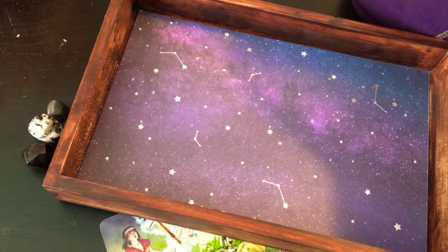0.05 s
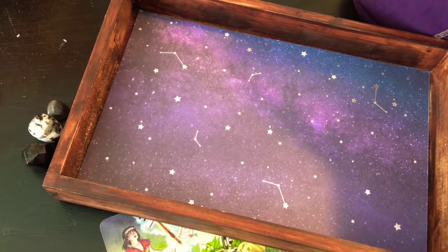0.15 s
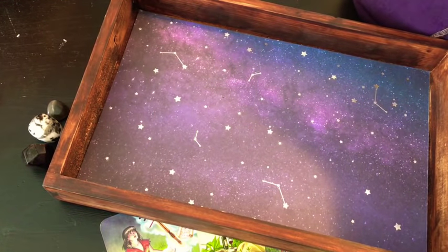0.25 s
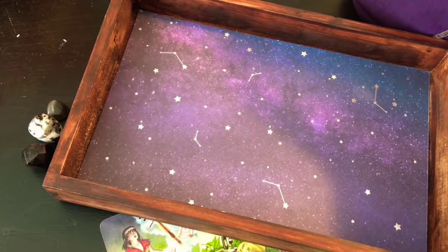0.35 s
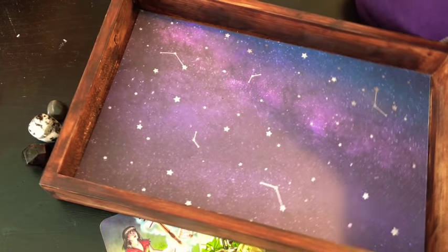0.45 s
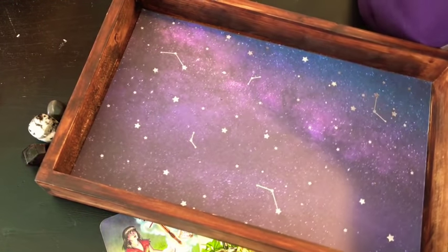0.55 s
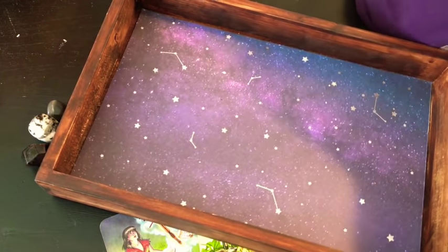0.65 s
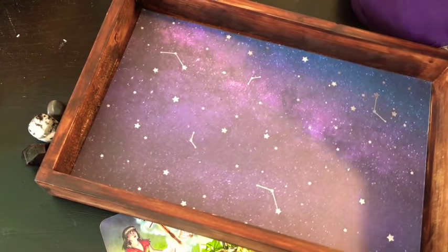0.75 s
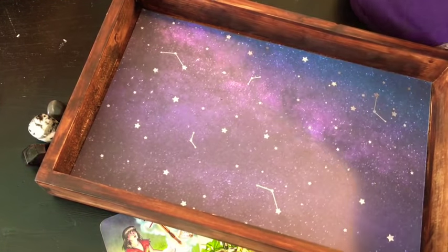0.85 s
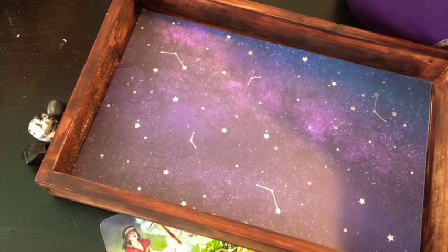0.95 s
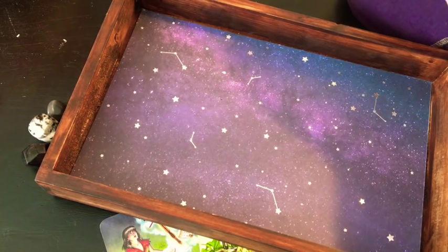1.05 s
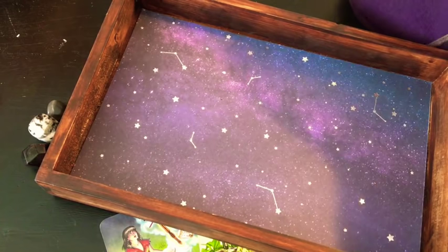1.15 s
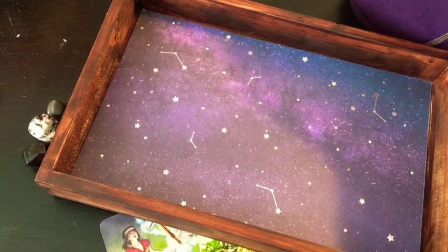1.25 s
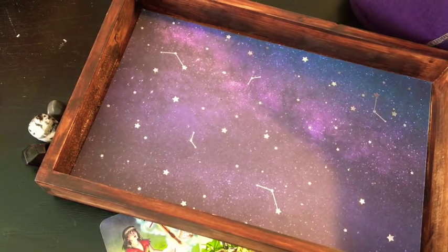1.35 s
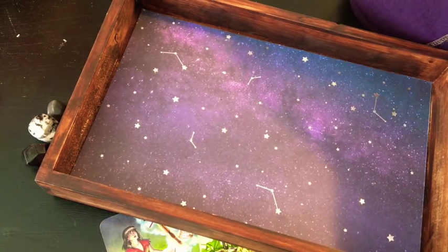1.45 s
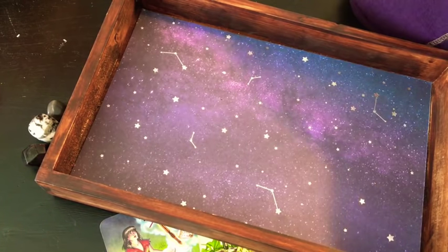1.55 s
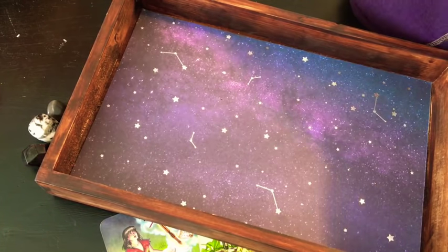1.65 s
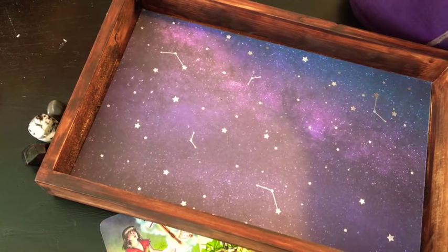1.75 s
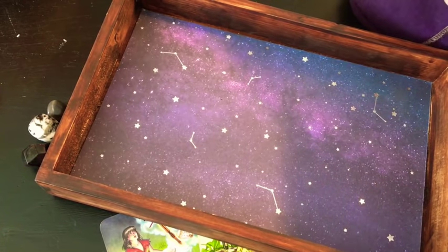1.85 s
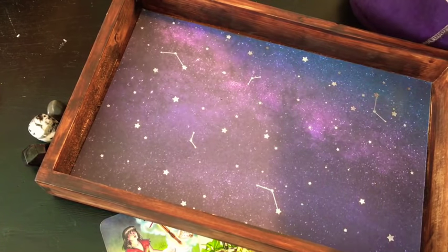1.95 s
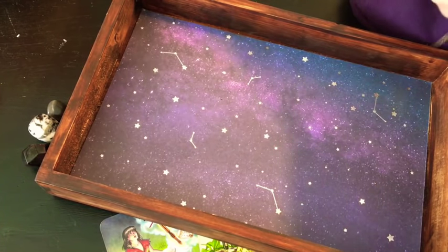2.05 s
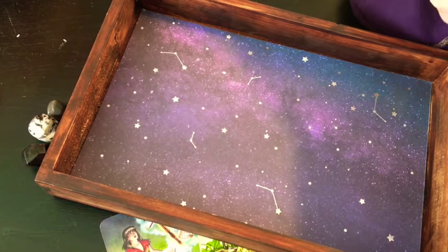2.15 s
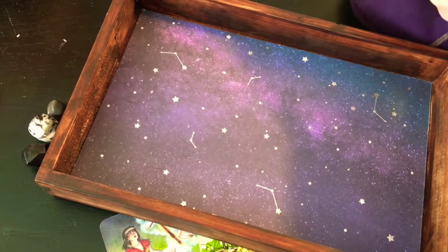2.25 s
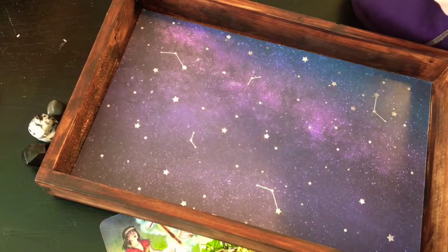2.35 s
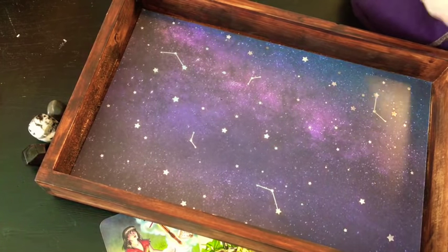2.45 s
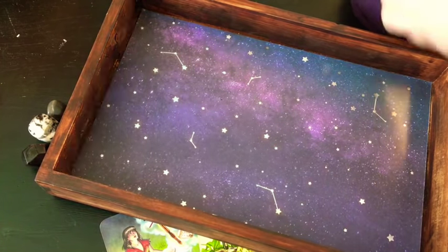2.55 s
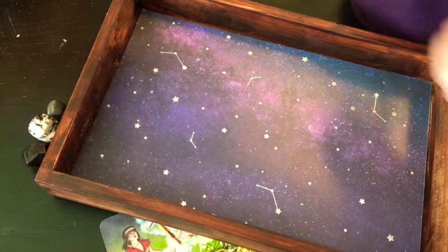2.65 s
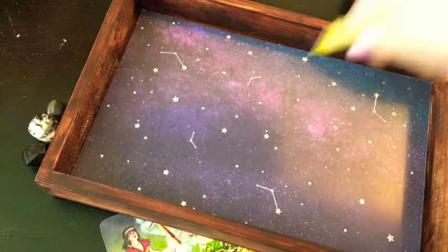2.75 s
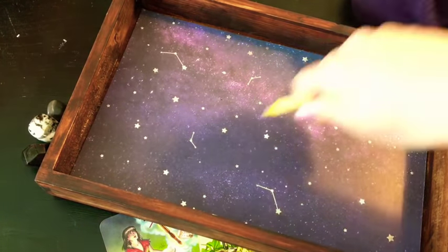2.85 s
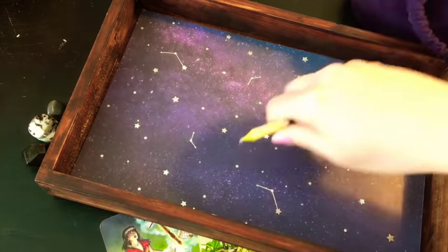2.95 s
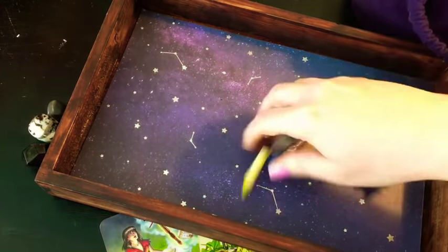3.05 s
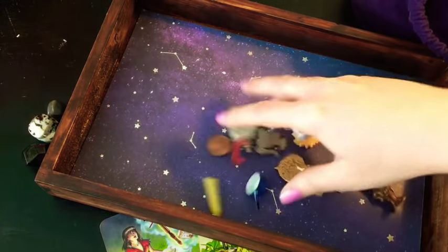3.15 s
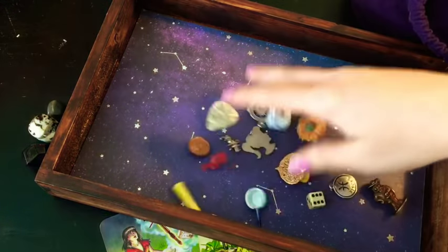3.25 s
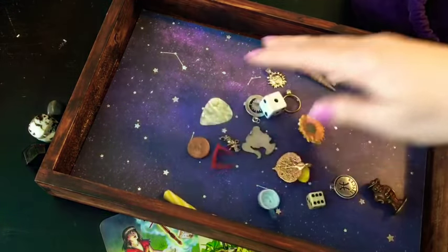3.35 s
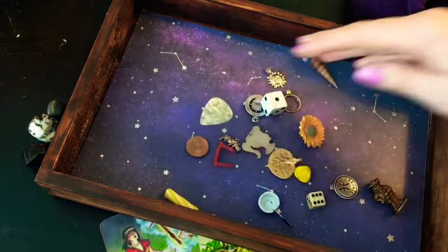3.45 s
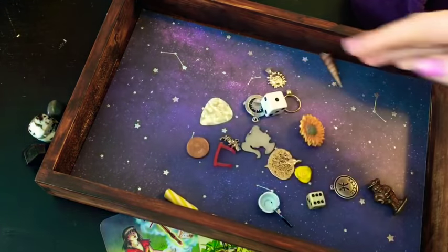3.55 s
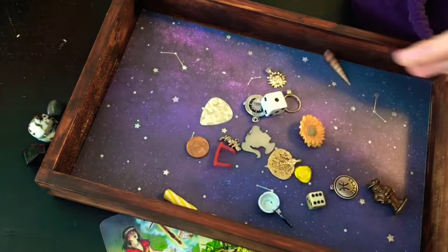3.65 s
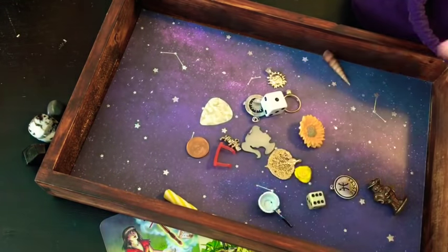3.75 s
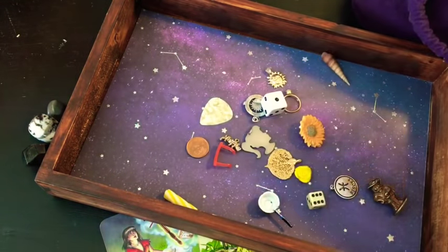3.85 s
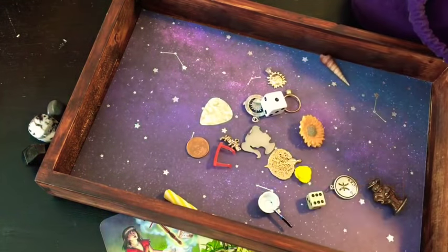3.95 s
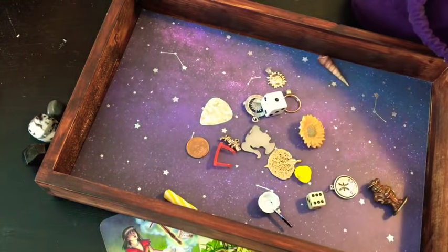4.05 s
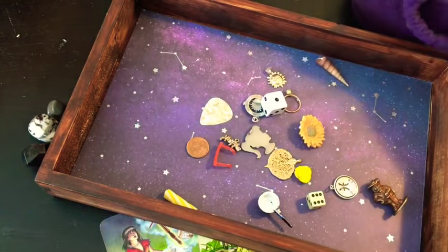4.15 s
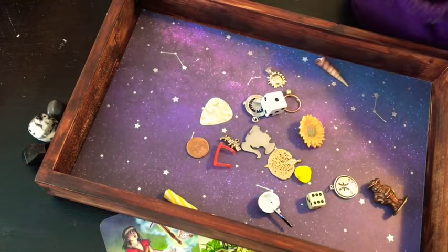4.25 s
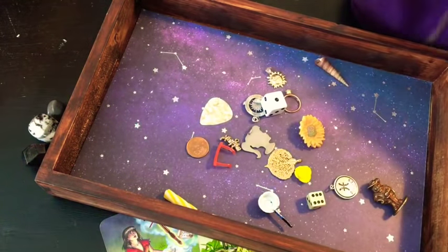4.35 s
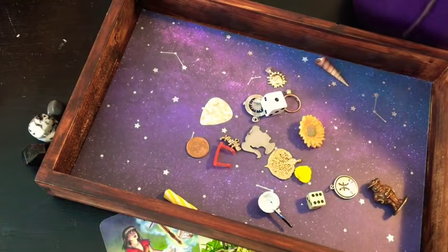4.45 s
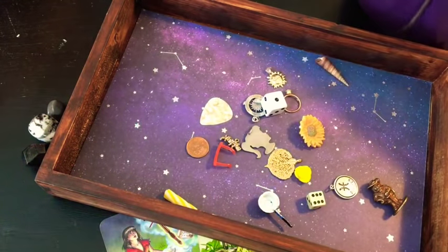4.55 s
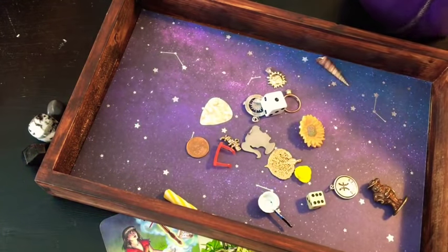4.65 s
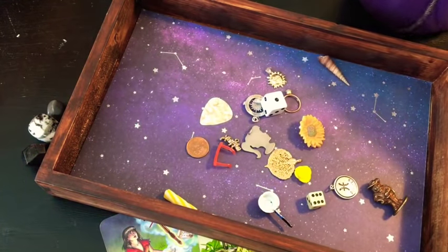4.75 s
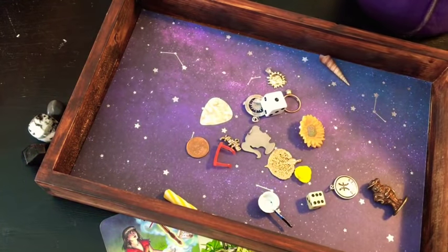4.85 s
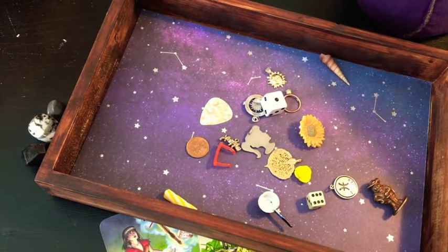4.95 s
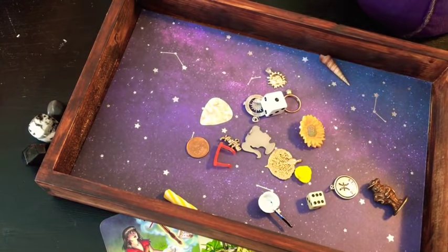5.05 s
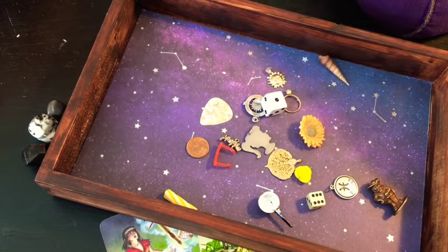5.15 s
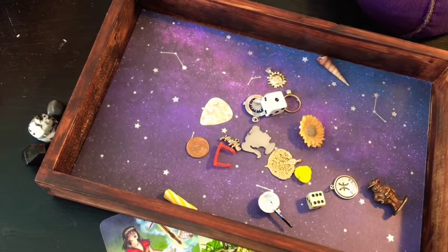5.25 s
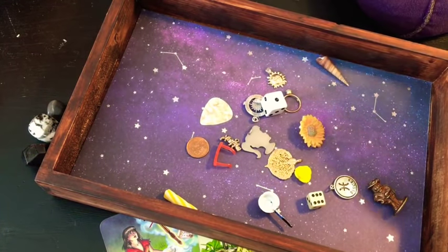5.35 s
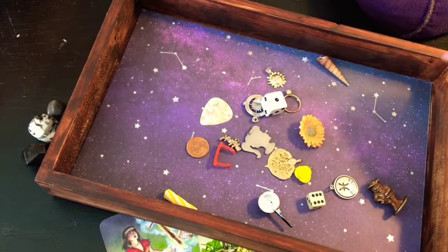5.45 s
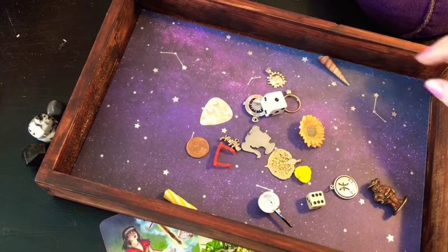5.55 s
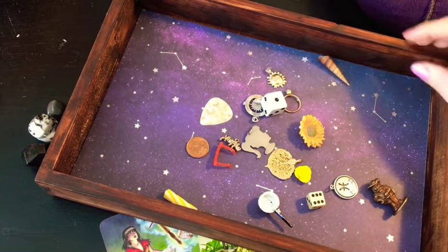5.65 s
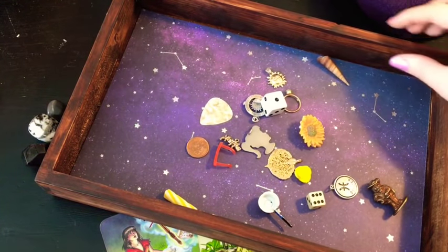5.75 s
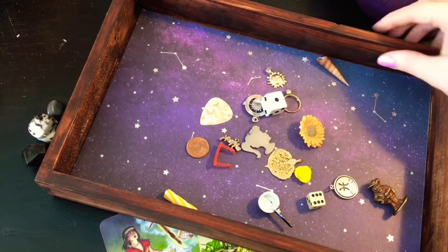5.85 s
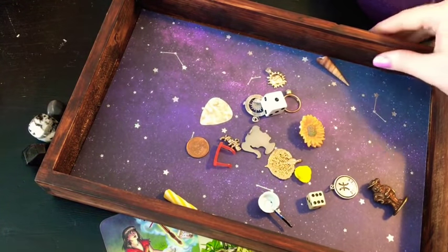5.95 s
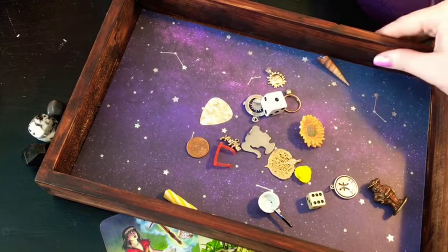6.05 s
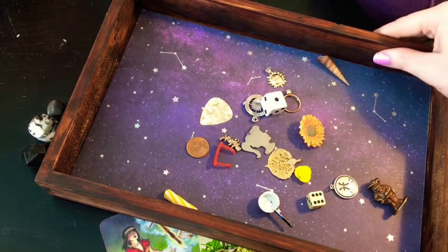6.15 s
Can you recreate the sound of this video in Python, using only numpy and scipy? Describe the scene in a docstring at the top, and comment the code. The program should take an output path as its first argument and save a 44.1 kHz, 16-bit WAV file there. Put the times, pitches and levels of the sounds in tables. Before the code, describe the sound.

Small metal charms jingle as a hand rummages in a cloth bag, then clatter hard onto a wooden tray, settle, and the bag jingles again.

```python
"""Metal charms cast on a wooden tray

A hand rummages in a cloth bag of charms, casts a handful on a tray, then stirs the bag twice more.
Bag: random contacts excite small metal modes, and filtered ticks make the cloth rustle.
Tray: timed strikes, a hail and a rocking disc excite board modes, over drumming bounces.
Low thuds, single ringing charms and a small room's echo; rumble, hiss and a soft brush behind."""
import sys
import numpy as np
from scipy import signal
from scipy.io import wavfile
from scipy.ndimage import uniform_filter1d

SR = 44100
rng = np.random.default_rng(int(sys.argv[2]) if len(sys.argv) > 2 else 0)


def wav_out(sig):
    """Save sig, one row per channel (or a flat mono array), as 16-bit PCM at SR to the path in sys.argv[1]."""
    wavfile.write(sys.argv[1], SR, np.round(np.clip(np.atleast_2d(sig).T, -1, 1) * 32767).astype(np.int16))


N = 272979
T = np.arange(N) / SR

# Levels are before trims in the source functions and before the room.
# Room rumble: (time [s], level [dB])
RUMBLE_LEVEL = [(0, -62.5), (1.9, -59.5), (2.2, -62.5), (2.6, -62), (3, -61), (3.9, -53.5), (4.1, -56),
                (4.5, -52.5), (5.2, -52.5), (6.19, -50.5)]
# Rumble spectrum: (frequency [Hz], relative level [dB])
RUMBLE_SPECTRUM = [(20, -20), (45, -3), (85, -7), (135, -1), (220, -6.5), (340, -14), (480, -15),
                   (700, -20.5), (1200, -23), (2000, -31.5), (3500, -42), (8000, -55.5), (16000, -56)]
# Microphone hiss spectrum: (frequency [Hz], relative level [dB])
HISS_SPECTRUM = [(200, -11), (3000, 3), (6500, 0), (10000, -3.5), (16000, -2)]
# Hand brushing up to the tray: (time [s], level [dB])
BRUSH_LEVEL = [(5.56, -76.5), (5.62, -66.5), (5.685, -53.5), (5.722, -54.5), (5.74, -65), (5.82, -75.5)]
# Brush spectrum: (frequency [Hz], relative level [dB])
BRUSH_SPECTRUM = [(500, -22.5), (1500, -1), (2600, -2), (3600, -10), (8000, -7.5), (16000, -14)]
# Room decay: (frequency [Hz], t60 [s])
ROOM_T60 = [(150, 0.66), (500, 0.39), (2000, 0.27), (6000, 0.71), (16000, 0.28)]

# Bag bumping on the table: (time [s], level [dB])
BUMPS = [(.082, -46.5), (.449, -63), (.492, -44), (.834, -40), (.903, -53), (.991, -45), (1.285, -42),
         (1.571, -41)]
# Table modes: (frequency [Hz], relative level [dB], t60 [s])
TABLE_MODES = [(111, 0, 0.14), (134.7, -1, 0.31), (248, -1, 0.11), (399, 0, 0.23), (573, -2.5, 0.073)]
# Heavy charms, and at last the hand, shaking the whole tray: (time [s], level [dB])
LANDINGS = [(3.111, -18.5), (3.134, -35), (3.174, -24), (3.279, -27), (3.355, -33.5), (3.395, -39.5),
            (6.16, -56.5), (6.179, -45.5)]
# Low tray modes: (frequency [Hz], relative level [dB], t60 [s])
TRAY_MODES = [(131, -9.5, 0.28), (198, -6.5, 0.31), (224, -2.5, 0.15), (268, -7, 0.14), (273, -3.5, 0.43),
              (398, 1, 0.18), (569, -3, 0.18), (925, 4.5, 0.059)]
# Dull push spectrum of a thud: (frequency [Hz], relative level [dB])
PUSH_SPECTRUM = [(25, -32.5), (60, -11.5), (120, -7.5), (300, -5), (600, 7), (900, -9), (1500, -14.5),
                 (5000, -56.5)]

# Strokes of the hand: (start [s], rise [s], hold [s], settling [dB/s], metal [dB], cloth [dB])
STIRS = [(0, .005, .012, 152, -32, -52.5), (0.047, .03, .11, 107, -33, -50),
         (.36, .02, .05, 150, -40.5, -62), (0.414, 0.035, 0.098, 144, -25, -42.5),
         (0.648, 0.066, 0.084, 88, -27.5, -42), (0.794, 0.032, 0.086, 109, -27, -41.5),
         (0.98, .012, 0.0097, 298, -24, -44), (1.014, 0.072, 0.077, 150, -28, -49.5),
         (1.167, 0.05, 0.12, 184, -30.5, -49), (1.411, .03, 0.031, 207, -40.5, -54),
         (1.567, .05, 0.068, 450, -37.5, -56), (1.727, 0.02, 0.11, 146, -43.5, -61),
         (1.936, .1, .13, 154.5, -61, -67), (2.296, .02, 0.087, 129, -56.5, -65),
         (2.582, 0.12, .09, 150.5, -58, -67.5), (2.781, .025, 0.072, 79, -45.5, -62.5),
         (2.948, 0.1, 0.042, 201, -40, -58.5), (4.222, .06, 0.07, 148, -58, -62.5),
         (4.312, 0.21, 0.074, 168, -29, -49), (4.595, 0.037, 0.064, 282, -32, -51),
         (4.866, 0.07, 0.072, 450, -35, -52.5), (5.046, 0.036, .07, 250, -61.5, -72)]
# Scraping metal spectrum: (frequency [Hz], relative level [dB])
JINGLE_SPECTRUM = [(1200, -36.5), (2200, -10), (4000, -1.5), (5200, -3.5), (6500, 4.5), (7700, -4),
                   (9200, 2), (11000, -1), (14000, 0), (16000, -7)]
# Cloth spectrum: (frequency [Hz], relative level [dB])
CLOTH_SPECTRUM = [(30, -17), (120, 9), (180, 2), (310, -2), (395, 6.5), (470, -8), (590, 5), (750, -4),
                  (1100, 1.5), (2600, 2.5), (5000, -13), (16000, -34)]
# Hard meetings of metal on metal: (time [s], level [dB], treble shelf [dB])
CLINKS = [(.0055, -26, -11.5), (.0821, -22.5, -3), (.0986, -20.5, 1), (.1203, -22.5, -4), (.1531, -20, 6.5),
          (.3737, -35.5, -10), (.4747, -16.5, -0.5), (.5417, -10.5, 30.5), (.5616, -19, 19.5),
          (.9036, -21.5, 1), (.9917, -19.5, 6), (1.159, -18, 8), (1.2646, -16, 4.5), (1.3056, -18, 36),
          (1.3335, -17, 7.5), (1.4912, -23.5, 4.5), (1.5627, -34, 1), (1.5715, -27, 7), (1.6353, -20, 27),
          (1.6888, -35, -4), (1.7503, -22.5, 13.5), (1.7846, -24, -0.5), (2.0555, -45.5, 5),
          (2.1301, -39, 9), (2.3151, -42, 7.5), (2.3626, -40.5, 0), (2.4889, -44, -6), (2.5875, -49, 7),
          (2.8022, -39, 6.5), (2.9665, -41.5, -11), (2.9946, -32, 1), (3.0287, -32.5, -2.5),
          (3.0426, -30.5, 14.5), (3.0619, -34.5, -4), (4.2865, -40.5, 4), (4.3482, -38, 2),
          (4.3982, -29.5, 8.5), (4.419, -25.5, 5), (4.4407, -21, 13), (4.5135, -20.5, 16),
          (4.5928, -20, 24), (4.6831, -19.5, 13), (4.8709, -44.5, -5), (4.9247, -29.5, 5),
          (5.0192, -21.5, 7.5), (5.0786, -40.5, -18), (5.1153, -39.5, -9), (5.2328, -46.5, -7.5)]
# Clink spectrum ahead of the shelf: (frequency [Hz], relative level [dB])
CLINK_SPECTRUM = [(300, -27), (1500, -10), (3500, -1.5), (6500, 1.5), (10000, -1.5), (16000, -2.5)]

# Charms that come free and ring: (time [s], charm [name], level [dB])
RINGS = [(.001, "clasp", -25.5), (.1, "medal", -28.5), (0.201, "medal", -25), (1.158, "star", -35),
         (1.205, "star", -27), (1.426, "link", -31.5), (1.591, "pendant", -32), (1.815, "pendant", -26),
         (2.128, "coin", -49), (2.708, "hoop", -44), (2.861, "hoop", -43.5), (2.967, "key", -49.5),
         (3.03, "key", -47), (3.042, "bead", -35.5), (3.18, "pendant", -19.5), (3.228, "disc", -28),
         (3.27, "disc", -34), (4.65, "clasp", -28.5), (4.72, "coin", -43), (4.956, "clasp", -31),
         (5.025, "key", -48), (5.115, "key", -55.5)]
# Modes of each named charm: (frequency [Hz], relative level [dB], t60 [s])
CHARM_MODES = {"medal": [(10900, 1.5, 0.21), (11500, -1, 0.25)], "pendant": [(7660, -0.5, .16),
               (9302, -10.5, .2), (12200, -7.5, .15), (13350, -13.5, .2)], "disc": [(9700, -3, .17),
               (9650, 1.5, .2), (15460, -2, .1)], "star": [(4570, -7, 0.087), (14500, 4, .12),
               (15200, -2, .2)], "clasp": [(11800, 1.5, .09), (13200, 1, .14)], "coin": [(6550, 5.5, 0.11)],
               "hoop": [(6030, 0.5, 0.16), (6380, -4, .1)], "link": [(9120, 1, 0.22)],
               "bead": [(14120, 1, .35)], "key": [(2600, -5, .1), (2970, -1, 0.12), (3404, -5.5, 0.08),
               (4200, -4.5, .07)]}

# Single knocks on the tray: (time [s], board knock [dB], charm click [dB], click treble shelf [dB])
STRIKES = [(3.1022, -8.5, -33, 6), (3.1111, -13, -14.5, 6), (3.1159, -5, -31, 3), (3.1258, -30, -18, -13),
           (3.134, -5, -16.5, -10), (3.1403, -8, -27, -13), (3.2104, -20.5, -14, 9),
           (3.2465, -17, -19, -13), (3.2623, -19, -19.5, -9), (3.2797, -11.5, -15, -14),
           (3.3259, -19, -30, -20), (3.3401, -19, -19.5, -7), (3.3553, -29, -16, -24),
           (3.3811, -17, -16.5, -30), (3.3954, -20, -36, -19), (3.4003, -29, -30.5, 20),
           (3.4228, -26, -32, -35), (3.4524, -21, -23, -8), (3.4589, -25, -28.5, -9),
           (3.4885, -24, -30, -18), (3.5146, -18, -28, -35), (3.5346, -26, -29.5, -5),
           (3.5504, -37, -29, -5), (3.5618, -26, -20, -13), (3.5729, -41, -25, -11), (3.591, -30, -25, -13),
           (3.7701, -25.5, -31, -30), (3.9828, -47, -66.5, -2), (4.1297, -52.5, -67, -3.5),
           (5.5715, -59, -64.5, -5), (5.7199, -48, -53.5, -2), (6.162, -43, -49.5, -10),
           (6.1807, -50, -46.5, -9.5)]
# Modes of the thin bottom board: (frequency [Hz], relative level [dB], t60 [s])
BOARD_MODES = [(700, -13, 0.057), (850, -5.5, .04), (1140, -9, 0.005), (1510, -10.5, 0.036),
               (1615, 1.5, 0.044), (1720, 0, 0.014), (1990, -13, 0.0053), (2160, -1.5, 0.026),
               (2150, -1, 0.019), (2490, -4, 0.015), (2770, -4.5, 0.026), (3050, -8.5, 0.013)]
# A small board radiates little bass: (frequency [Hz], relative level [dB])
RADIATION = [(30, -36), (150, -11), (600, -3.5), (1200, 1.5), (16000, -3)]
# Dense board clatter spectrum: (frequency [Hz], relative level [dB])
CLATTER_SPECTRUM = [(30, -60.5), (150, -27.5), (350, -19), (550, -11), (900, -14), (1250, -6.5),
                    (1600, 0.5), (1800, 2.5), (1980, -7), (2230, -3), (2800, -9.5), (4000, -12),
                    (6000, -26), (14000, -45)]
# Charm click spectrum ahead of the shelf: (frequency [Hz], relative level [dB])
CLICK_SPECTRUM = [(30, -62), (200, -29), (900, -3), (2500, 4.5), (5000, 2), (9000, -1), (16000, -10.5)]
# First landing of the hail: (knock [dB], click [dB], treble shelf [dB])
HAIL_FIRST = (-10, -13, -14.5)
# Last landing of the hail: (knock [dB], click [dB], treble shelf [dB])
HAIL_LAST = (-18.5, -23, 2)

# Strokes: late final stop of the heap; cloth settles more slowly than metal
STOP_AFTER_S, STOP_DB_PER_S = 0.38, 200
CLOTH_SETTLE_SHARE = 0.95
# Chance clinks, level relative to the metal gain
STRAY_DB, STRAY_SCATTER_DB, STRAY_TREBLE_DB = -4, 3.5, 2.5
RING_ONSET_T60_S = .0059
HAIL_START_S, HAIL_LENGTH_S = 3.144, 0.068
# Disc rocking from rim to rim: each gap is shorter, each swing touches twice and firmer
ROCK_START_S, ROCK_FIRST_GAP_S, ROCK_SHRINK = 3.562, .051, .905
ROCK_KNOCK_DB, ROCK_CLICK_DB, ROCK_TREBLE_DB, ROCK_RING_DB = -30.5, -31, -31, -57
ROCK_TOUCH_S, ROCK_GROW_DB = 0.0045, 1.5
# Small bounces: calm from a top level towards a rolling level, then stop
SKITTER_START_S, SKITTER_RISE_S, SKITTER_LENGTH_S, SKITTER_STOP_DB_PER_S = 3.125, .025, 0.726, 600.5
WOOD_TOP_DB, WOOD_ROLL_DB, WOOD_CALM_S = -18, -34, 0.11
METAL_TOP_DB, METAL_ROLL_DB, METAL_CALM_S = -16.5, -55, 0.2
LOW_CUT_HZ, EDGE_HZ = 42, 15900


def amp(db):
    """dB to amplitude."""
    return 10 ** (np.asarray(db) / 20)


def evened(x):
    """Scales to unit RMS."""
    return x / np.sqrt(np.mean(x ** 2) + 1e-20)


def attack_one(x, size=176):
    """Scales a blow so that its first samples have unit power."""
    return x / np.sqrt(np.mean(x[:size] ** 2) + 1e-20)


def read(points, hz):
    """Curve value, interpolated over log frequency."""
    f, value = np.transpose(points)
    return np.interp(np.log(hz + 1), np.log(f + 1), value)


def level(rows):
    """Gain along a dB curve over time; -120 dB outside it."""
    s, db = np.transpose(rows)
    return amp(np.interp(T, s, db, left=-120, right=-120))


def add(mix, s, sound):
    """Adds a sound in place at a time in seconds."""
    part = mix[max(round(s * SR), 0):][:len(sound)]
    part += sound[:len(part)]


def colour(x, points, treble_db=0, split_hz=7000, size=2048):
    """Minimum-phase filter from a spectrum, with a shelf on the treble."""
    hz = abs(np.fft.fftfreq(size, 1 / SR))
    shelf = 1 / (1 + (split_hz / (hz + 1)) ** 6)
    gain_db = np.maximum(read(points, hz) + treble_db * shelf, -90)
    log_gain = np.log(amp(gain_db))
    spectrum = np.exp(np.conj(signal.hilbert(log_gain)))
    taps = np.fft.ifft(spectrum).real[:size // 2]
    return signal.oaconvolve(x, taps)[:len(x)]


def fade(t, t60):
    """Exponential decay, down 60 dB at t60."""
    return np.exp(-np.log(1000) * t / t60)


def ring(modes, t, spread_db=0):
    """Decaying modes with random signs, and strengths scattered by spread_db."""
    hz, db, t60 = np.transpose(modes)[:, :, None]
    sign = rng.choice([-1, 1], hz.shape)
    strength = sign * amp(db + spread_db * rng.standard_normal(hz.shape))
    return (strength * fade(t, t60) * np.sin(2 * np.pi * hz * t)).sum(0)


def contact(mid_t60, snap_t60, ring_db, count=14):
    """One small piece of metal is hit: a noise snap and high modes of scattered decay."""
    t = T[:4000]
    hz = 2800 + 13200 * (np.arange(count) + rng.random(count)) / count
    t60 = mid_t60 * rng.uniform(0.41, 2.6, count)
    modes = np.transpose([hz, np.zeros(count), t60])
    snap = rng.standard_normal(len(t)) * fade(t, snap_t60)
    tone = ring(modes, t, spread_db=7.5)
    return attack_one(attack_one(snap) + amp(ring_db) * attack_one(tone))


def chatter(sound, within, bounce_db, count=4):
    """A loose piece touches again a few times right after the first contact."""
    out = sound.copy()
    for delay in within * (np.arange(count) + rng.random(count)) / count:
        gain = rng.choice([-1, 1]) * amp(bounce_db) * fade(delay, 8 * within)
        add(out, delay, gain * sound)
    return out


def ticks(per_s, spread_db):
    """Random impulses; sizes scatter exponentially in dB, up or down with the sign of spread_db."""
    hit = rng.random(N) < per_s / SR
    size_db = spread_db * np.minimum(rng.exponential(1, N), 3.5)
    return hit * rng.choice([-1, 1], N) * amp(size_db)


def steadied(x, size=1800):
    """Divides out the slow level of a random rattle and keeps its grain."""
    power = uniform_filter1d(uniform_filter1d(x ** 2, size), size)
    return x / np.sqrt(abs(power) + np.mean(x ** 2) / 100)


def jingle(per_s, spread_db, mid_t60, ring_db, count=28):
    """A heap of charms, each with its own modes and its own chance contacts."""
    out = np.zeros(N)
    for _ in range(count):
        hits = ticks(per_s / count, spread_db)
        out += signal.oaconvolve(hits, contact(mid_t60, 0.0011, ring_db))[:N]
    return steadied(out)


def room(x, early_db, tail_db, count=10):
    """Adds sparse early echoes of tray walls and table, and a tail decaying per frequency."""
    early = np.zeros(SR)
    early[(rng.uniform(.001, .016, count) * SR).astype(int)] = rng.choice([-1, 1], count)
    taps = rng.standard_normal(SR) * (rng.random(SR) < .1) * (T[:SR] > .006)
    hz, t, z = signal.stft(taps, SR, nperseg=256)
    decay = fade(t, read(ROOM_T60, hz)[:, None])
    tail = signal.istft(z * decay, SR, nperseg=256)[1][:SR]
    tail = colour(tail, [(100, 5.5), (2000, -1.0), (6000, -6.5), (16000, -8)])  # (Hz, dB)
    echo = amp(early_db) * early / np.linalg.norm(early) + amp(tail_db) * tail / np.linalg.norm(tail)
    return x + signal.oaconvolve(x, echo)[:N]


def background():
    """Filtered noise for room rumble and hiss; dense ticks for the brush of the reaching hand."""
    rumble = evened(colour(rng.standard_normal(N), RUMBLE_SPECTRUM, size=8192)) * level(RUMBLE_LEVEL)
    hiss = amp(-69.5) * evened(colour(rng.standard_normal(N), HISS_SPECTRUM))
    brush = evened(colour(ticks(per_s=4000, spread_db=-3), BRUSH_SPECTRUM)) * level(BRUSH_LEVEL)
    return rumble + hiss + brush


def hollow_note():
    """One early bump hums on briefly, hollow, rising a little in pitch."""
    hz = np.interp(T, [.524, .564], [245, 279])
    gain = level([(.524, -64), (.54, -39), (.589, -38), (.63, -47), (.7, -77)])  # (s, dB)
    return gain * np.sin(2 * np.pi * np.cumsum(hz) / SR)


def thuds(blows, modes, push_db):
    """Weight comes down: a dull noise push, and low modes of the wood."""
    out, t = np.zeros(N), T[:SR // 2]
    for s, db in blows:
        noise = rng.standard_normal(len(t)) * fade(t, .07)
        push = attack_one(colour(noise, PUSH_SPECTRUM), size=900)
        boom = attack_one(ring(modes, t), size=900)
        add(out, s, amp(db) * attack_one(boom + amp(push_db) * push, size=900))
    return out


def stroke(start, rise, hold, settle_db_per_s):
    """Gain of one hand stroke: squared rise, hold, settling, then a faster final stop."""
    t = T - start
    after = np.maximum(t - rise - hold, 0)
    fall_db = settle_db_per_s * after + STOP_DB_PER_S * np.maximum(after - STOP_AFTER_S, 0)
    return np.clip(t / rise, 0, 1) ** 2 * amp(-fall_db)


def stirring():
    """Gains of metal and cloth: the strongest stroke at each moment."""
    metal, cloth = [], []
    for s, rise, hold, settle, metal_db, cloth_db in STIRS:
        metal.append(amp(metal_db) * stroke(s, rise, hold, settle))
        cloth.append(amp(cloth_db) * stroke(s, rise, hold, CLOTH_SETTLE_SHARE * settle))
    return np.max(metal, axis=0), np.max(cloth, axis=0)


def tinkles(per_s, mid_t60, spread_db, favourite_hz, favourite_share):
    """Brief notes of single charms, each at its own pitch; many alike charms share one range."""
    out, t = np.zeros(N), T[:4000]
    draws = rng.random((int(per_s * N / SR), 5))
    for slot, (when, kind, pitch, length, size) in enumerate(draws):
        if kind < favourite_share:
            hz = favourite_hz * (.92 + .16 * pitch)
        else:
            hz = 5000 + 10800 * pitch ** .7
        onset = 1 - fade(t, .01)
        note = np.sin(2 * np.pi * hz * t) * fade(t, mid_t60 * (.4 + 1.2 * length)) * onset
        add(out, (slot + when) / per_s, amp(spread_db * size) * note)
    return evened(steadied(out, size=5000))


def bag(metal_gain, cloth_gain):
    """Stirred charms scrape and tinkle while the cloth rustles round them."""
    heap = jingle(per_s=1500, spread_db=3.5, mid_t60=0.016, ring_db=-3.5, count=40)
    scrape = evened(colour(heap, JINGLE_SPECTRUM))
    notes = tinkles(per_s=450, mid_t60=.045, spread_db=22, favourite_hz=6400, favourite_share=.17)
    metal = evened(scrape + .6 * notes)
    cloth = evened(colour(steadied(ticks(per_s=1500, spread_db=2.5)), CLOTH_SPECTRUM))
    return amp(-1.4) * metal * metal_gain + amp(2.0) * cloth * cloth_gain


def clink(treble_db):
    """Metal meets metal in a quick run of touches."""
    touch = contact(mid_t60=0.018, snap_t60=0.0073, ring_db=-6)
    run = chatter(touch, within=.009, bounce_db=-1.5, count=5)
    return amp(-5.5) * attack_one(colour(run, CLINK_SPECTRUM, treble_db - 0.5), size=300)


def clinks(metal_gain, count=110):
    """The hard clinks, and chance ones that follow the gain of the moving heap."""
    out = np.zeros(N)
    for s, db, treble_db in CLINKS:
        add(out, s, amp(db) * clink(treble_db))
    for slot in range(count):
        at = int((slot + rng.random()) / count * N)
        stray_db = STRAY_DB + STRAY_SCATTER_DB * rng.standard_normal()
        add(out, at / SR, metal_gain[at] * amp(stray_db) * clink(STRAY_TREBLE_DB))
    return out


def swings(count=9):
    """Moments at which the rocking disc comes down; at the last one it lies flat."""
    gaps = ROCK_FIRST_GAP_S * ROCK_SHRINK ** np.arange(count - 1)
    return ROCK_START_S + np.append(0, np.cumsum(gaps))


def rings():
    """A charm that comes free rings in its own modes; every swing keeps the rocking disc ringing."""
    out, t = np.zeros(N), T[:SR // 2]
    onset = 1 - fade(t, RING_ONSET_T60_S)
    disc = [(s, "disc", ROCK_RING_DB) for s in swings()[:-1]]
    for s, charm, db in RINGS + disc:
        add(out, s, amp(db) * ring(CHARM_MODES[charm], t) * onset)
    return out


def calming(top_db, roll_db, calm_s):
    """Gain of the small bounces: up to a top, down towards a steady rolling, then a quick stop."""
    t = T - SKITTER_START_S
    db = roll_db + (top_db - roll_db) * np.exp(-np.maximum(t - SKITTER_RISE_S, 0) / calm_s)
    stop_db = SKITTER_STOP_DB_PER_S * np.maximum(t - SKITTER_LENGTH_S, 0)
    return np.clip(t / SKITTER_RISE_S, 0, 1) ** 2 * amp(db - stop_db)


def skitter():
    """Small bounces and the rolling of the last charm drum on the board."""
    taps = steadied(ticks(per_s=900, spread_db=-2.5), size=500)
    wood = evened(colour(taps, CLATTER_SPECTRUM))
    heap = jingle(per_s=280, spread_db=6.0, mid_t60=.025, ring_db=-1.5)
    metal = evened(colour(heap, CLICK_SPECTRUM))
    wood_gain = calming(WOOD_TOP_DB, WOOD_ROLL_DB, WOOD_CALM_S)
    metal_gain = calming(METAL_TOP_DB, METAL_ROLL_DB, METAL_CALM_S)
    return wood * wood_gain + metal * metal_gain


def rocking():
    """Two light touches of the rim for each swing: rows like STRIKES."""
    downs = swings()[:-1]
    rows = []
    for s, db in zip(downs, np.linspace(0, ROCK_GROW_DB, len(downs))):
        for lag in (0, ROCK_TOUCH_S):
            rows.append((s + lag, ROCK_KNOCK_DB + db, ROCK_CLICK_DB + db, ROCK_TREBLE_DB))
    return rows


def hail(count=11):
    """The bulk lands at chance moments, heavy pieces first, light bright ones last: rows like STRIKES."""
    share = (np.arange(count) + rng.random(count)) / count
    dbs = np.outer(1 - share, HAIL_FIRST) + np.outer(share, HAIL_LAST)
    return list(np.column_stack([HAIL_START_S + HAIL_LENGTH_S * share, dbs]))


def strikes():
    """Each landing knocks the board's main modes and a short noise clack, and clicks the charm."""
    out, t = np.zeros(N), T[:6000]
    for s, knock_db, click_db, treble_db in STRIKES + hail() + rocking():
        clack = colour(rng.standard_normal(len(t)) * fade(t, .02), CLATTER_SPECTRUM)
        modes = colour(ring(BOARD_MODES, t, spread_db=2.5), RADIATION)
        knock = attack_one(attack_one(modes) + amp(-4.0) * attack_one(clack))
        add(out, s, amp(knock_db - 2.0) * knock)
        touch = contact(mid_t60=0.018, snap_t60=0.011, ring_db=-10.5)
        click = chatter(touch, within=0.0044, bounce_db=-4)
        add(out, s, amp(click_db) * attack_one(colour(click, CLICK_SPECTRUM, treble_db - 0.5)))
    return out


def scene():
    """Bag, ringing charms and tray with room echo, over dry thuds and background."""
    low = thuds(BUMPS, TABLE_MODES, push_db=-11) + thuds(LANDINGS, TRAY_MODES, push_db=-2.5)
    low += hollow_note()
    metal_gain, cloth_gain = stirring()
    in_bag = room(bag(metal_gain, cloth_gain) + clinks(metal_gain), early_db=-12.5, tail_db=-16.0)
    ringing = room(rings(), early_db=-20, tail_db=-15.5)
    on_tray = room(strikes() + skitter(), early_db=-13, tail_db=-16.5)
    return (background() + low + in_bag + ringing + on_tray)[None]


def record(dry):
    """Rounds off the loudest peaks, then applies the microphone's low cut and the band limit."""
    rounded = dry / (1 + dry ** 8) ** (1 / 8)
    low_cut = signal.butter(2, LOW_CUT_HZ, "high", fs=SR, output="sos")
    thinned = signal.sosfilt(low_cut, rounded)
    band_limit = signal.firwin(401, EDGE_HZ, window=("kaiser", 8), fs=SR)
    return signal.oaconvolve(thinned, band_limit[None], "same")


dry = scene()
out = record(dry)
wav_out(out)
```